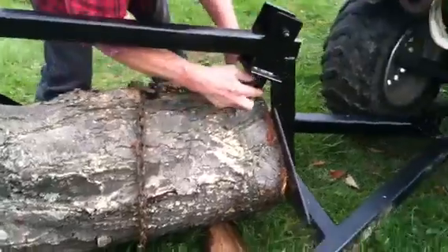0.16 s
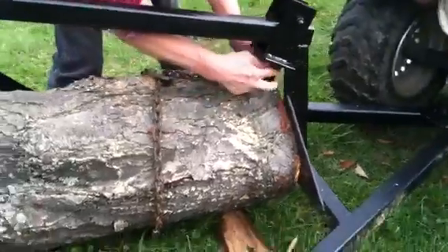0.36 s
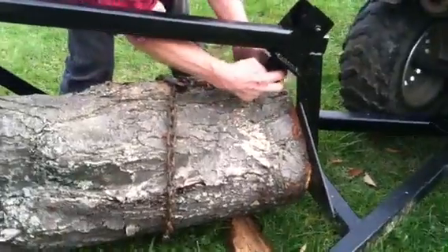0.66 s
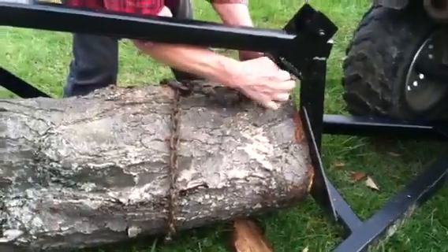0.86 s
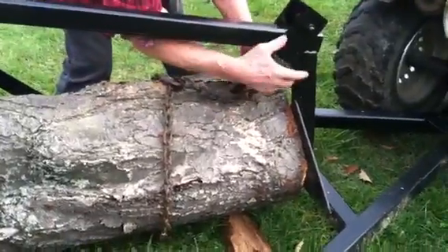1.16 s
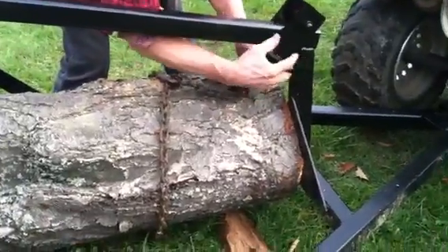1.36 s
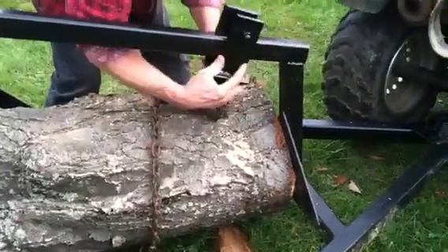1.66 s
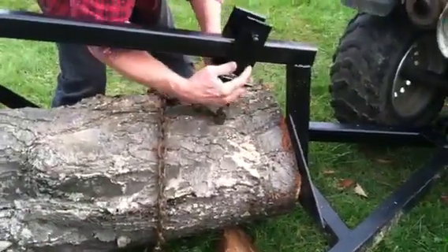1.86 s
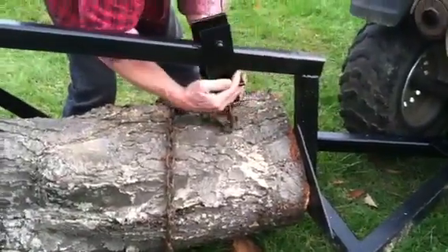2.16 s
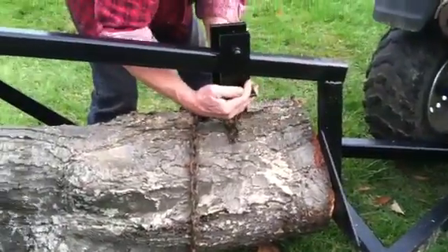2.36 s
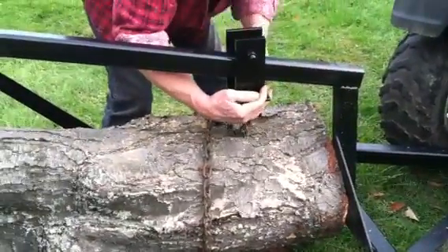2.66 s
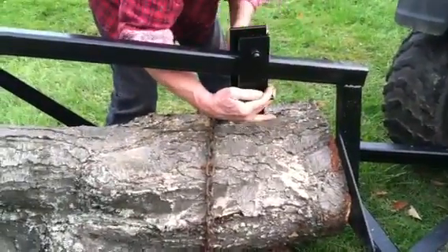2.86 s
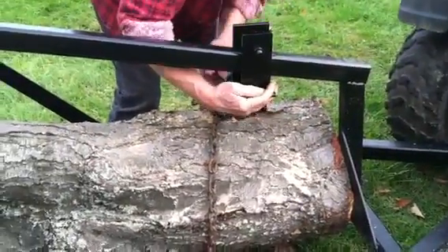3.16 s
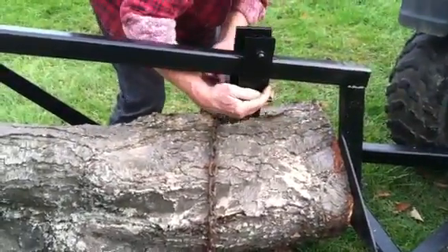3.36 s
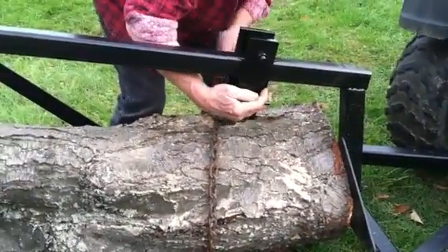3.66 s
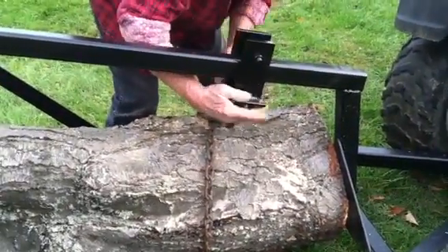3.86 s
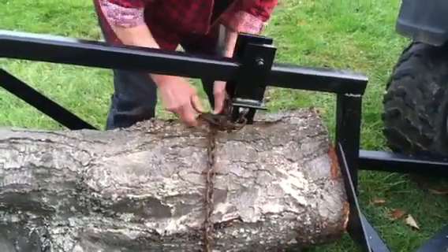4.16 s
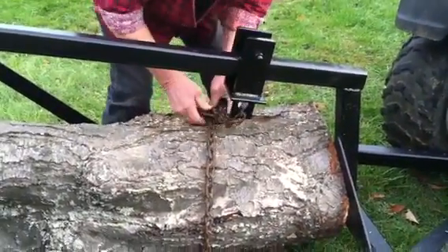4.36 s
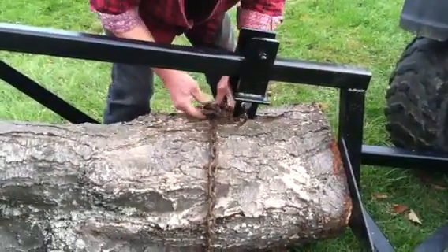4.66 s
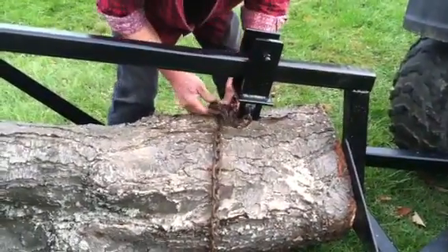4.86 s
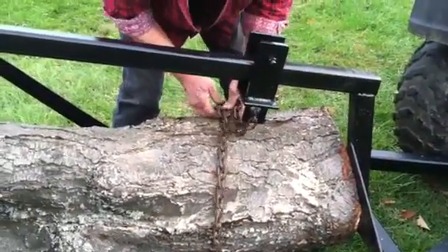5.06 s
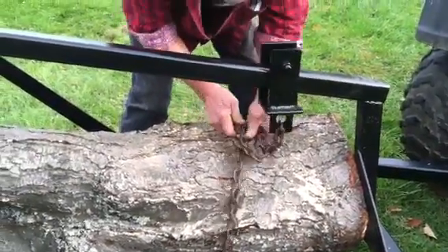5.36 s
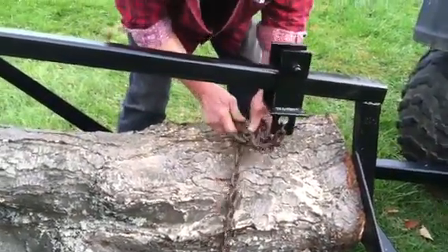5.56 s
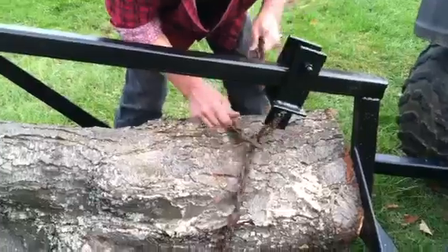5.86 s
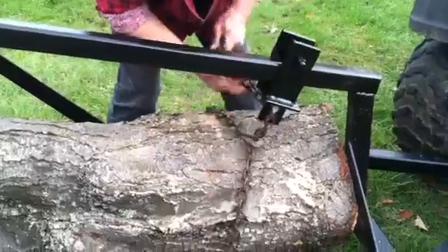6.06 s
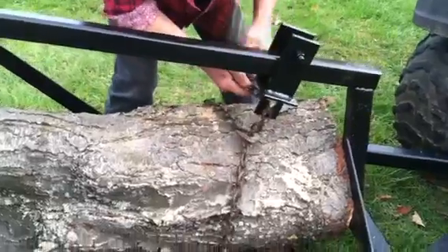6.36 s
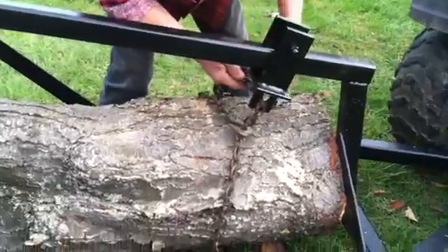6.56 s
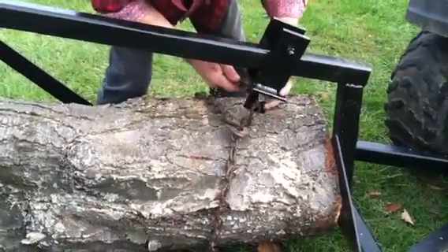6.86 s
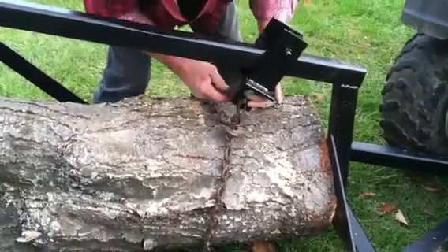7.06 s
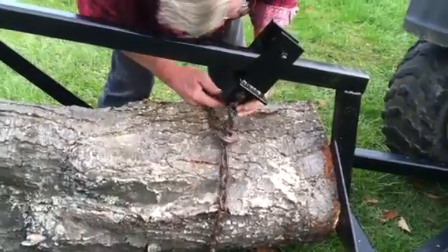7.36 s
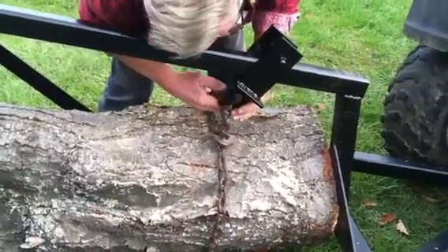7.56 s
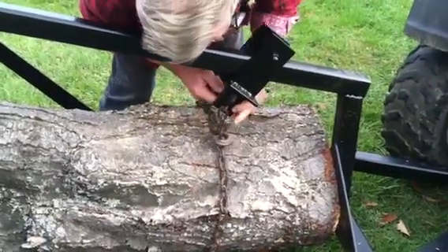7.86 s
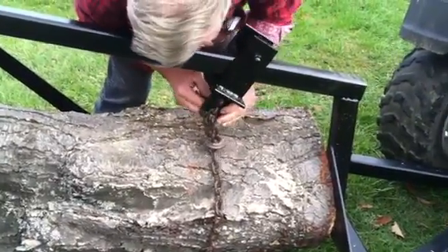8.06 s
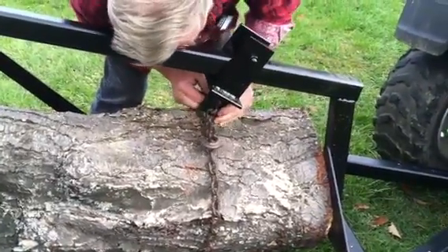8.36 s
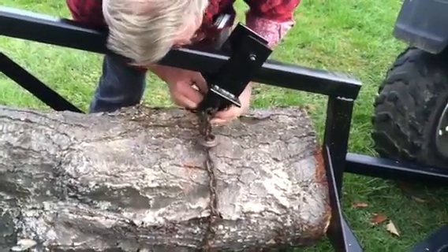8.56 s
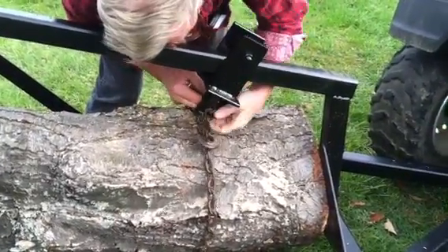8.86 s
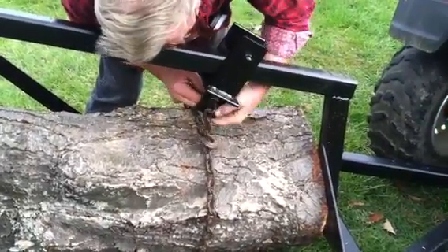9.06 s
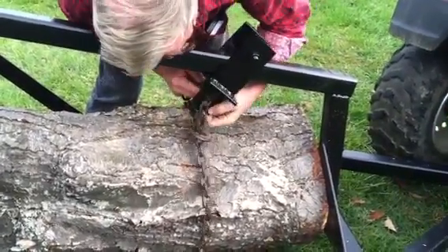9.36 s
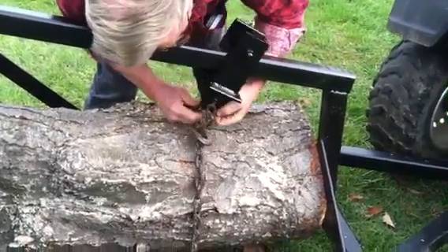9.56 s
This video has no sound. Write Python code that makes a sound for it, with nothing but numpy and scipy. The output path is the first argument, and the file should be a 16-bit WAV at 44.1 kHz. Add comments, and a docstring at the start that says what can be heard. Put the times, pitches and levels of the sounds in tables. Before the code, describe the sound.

Close microphone in an open yard, faint steady air underneath. A small steel hook clinks lightly, then a bracket scrapes in jerks along a hollow beam. Chain links clash sharply in bursts, tick between fingers and rub softly over rough bark. A dense rattling clatter comes around six seconds, then two loud, blunt, ringing knocks on the beam late on, with quieter fiddling between them.

```python
"""Outdoor yard, close by: a steel chain is hooked around a log under a trailer's steel frame.
The hook clinks, and its bracket grates along and knocks on the hollow beam; links clash, tick and drag over bark.
Steel rings as sums of decaying modes; friction is random grains through such modes or a spectrum.
Soft low bumps and rumble on the microphone, a faint echo and steady filtered noise lie underneath."""
import sys
import numpy as np
from scipy import signal
from scipy.fft import rfft, irfft, next_fast_len
from scipy.io import wavfile

SR = 44100
rng = np.random.default_rng(int(sys.argv[2]) if len(sys.argv) > 2 else 0)


def master(y):
    """Save y as 16-bit WAV."""
    cut = np.clip(np.atleast_2d(y).T, -1, 1)
    pcm = np.round(cut * 32767)  # scale
    wavfile.write(sys.argv[1], SR, pcm.astype(np.int16))


N = 428211
T = np.arange(int(SR * .7)) / SR  # time within one sound, s

# modes of the hollow beam and its bracket: pitch_hz, level_db, t60_s
BEAM = [(275, -15, .24), (428, -13, .27), (776, -17, .45), (1007, -7, .36), (1105, -5, .32),
        (1178, -3, .18), (1254, -4, .33), (1284, 0, .24), (1484, -13, .55), (1615, -15, .42),
        (1730, -11, .48), (1790, -10, .3), (1857, -6, .34), (1905, -13, .3), (2003, -19, .45),
        (2237, -18, .45), (2401, -20, .42), (2490, -18, .35), (3020, -25, .35), (3446, -22, .4),
        (3535, -25, .5), (4985, -28, .5), (5227, -27, .33), (6858, -23, .7), (7154, -27, .5),
        (7410, -27, .3), (7750, -27, .25), (8250, -29, .3)]
BEAM_HZ = np.transpose(BEAM)[0]
# spectrum of the chain links: freq_hz, level_db
LINKS = [(1500, -17.5), (2500, 2), (4000, -6.5), (5900, 4.5), (7500, 5), (9000, -2.5), (10800, -7.5),
         (12500, -4.5), (15000, -22)]
# spectrum of the bracket: freq_hz, level_db
BRACKET = [(30, -77), (130, -3), (420, -5.5), (950, 4), (1600, 16), (2500, 5), (3400, 2), (4400, -5),
           (12000, -32.5)]
SCATTER_DB = 2.5  # spread of mode strengths from contact to contact


def knocks():
    """Heavy, blunt blows ring the beam's low modes over a thud of the whole frame."""
    # bracket on beam: start_s, level_db, favoured_hz (set by the point of contact)
    blows = [(0.499, -42, 1200), (0.628, -18, 955), (0.708, -18.5, 960), (1.759, -25, 1210),
             (1.49, -39.5, 700), (4.328, -46.5, 780), (5.925, -14, 1360), (5.97, -21, 715),
             (7.2477, -4, 1160), (7.453, -31, 810), (8.13, -20.5, 1090), (8.745, -44, 1000),
             (9.4002, -4, 1500), (9.523, -29, 380)]
    # spectrum of the frame's thud: freq_hz, level_db
    thud_spectrum = [(30, -45.5), (90, -24), (200, 3), (500, 10), (1200, 6), (2200, -2.5), (4000, -18.5),
                     (9000, -25), (15000, -46)]
    favour_db_per_octave = 15.5  # loss of modes away from the favoured pitch
    thud_db, thud_db_per_db = -10, 0.5  # thud grows slower than the ring: soft blows mostly thud
    sing_spectrum = [(1800, -26.0), (3450, -15.5), (5000, -14), (7000, -20.5)]
    out = np.zeros(N)
    for start_s, level_db, favoured_hz in blows:
        contact = amp(-favour_db_per_octave * np.abs(np.log2(BEAM_HZ / favoured_hz)))
        ring = modes_ring(BEAM, contact, scatter_db=2.0) + amp(-5) * puff(BRACKET, 0.057)
        sing = beam_ring(sing_spectrum, scatter_db=SCATTER_DB)
        thud = puff(thud_spectrum, 0.17)
        thud = thud + amp(-6.5) * cluster(thud_spectrum, 0.33, count=110, top_hz=3395)
        steel = amp(level_db) * (ring + amp(-20.5) * sing)
        blow = steel + amp(thud_db + thud_db_per_db * level_db) * thud
        add(out, start_s, amp(-11.5) * blow * rise(0.00093))
    return out


def clinks(count=3):
    """The hand damps the hook; each tap chatters briefly and favours the modes near one pitch."""
    # hook taps: start_s, level_db, t60_s (of the first touch), favoured_hz (set by the point of contact)
    taps = [(0.065, -32.5, 0.04, 4460), (0.197, -31.5, 0.24, 4660), (.342, -21.5, 0.042, 6760),
            (0.468, -36.5, 0.13, 5100), (0.622, -24, 0.096, 4320), (0.653, -27, 0.074, 5200),
            (0.8826, -38.5, 0.011, 4740), (1.061, -36.5, 0.06, 4470), (0.941, -25.5, 0.063, 3860),
            (0.975, -33.5, 0.17, 5460), (0.991, -24, 0.005, 6900), (1.001, -30, 0.048, 4140),
            (1.034, -31, 0.057, 5550), (1.458, -36, 0.032, 4440), (3.4126, -27, 0.04, 10700),
            (5.111, -45.5, 0.017, 2900), (5.264, -43.5, 0.06, 3000), (5.663, -48, 0.06, 3130),
            (5.845, -19.5, 0.097, 8200), (5.865, -23.5, 0.1, 5700), (5.889, -27, 0.099, 4530),
            (5.9, -17, 0.099, 6060), (7.148, -40, 0.081, 4870), (7.537, -39, 0.079, 5300),
            (8.682, -32.5, 0.055, 6350), (8.726, -41.5, 0.024, 5850), (9.416, -30.5, 0.073, 4280),
            (9.555, -38.5, 0.42, 5860)]
    # modes of the hook: pitch_hz, level_db
    hook_modes = [(2550, 16), (4460, 7.5), (5230, -9.5), (5960, 0), (6390, 1), (7320, 7), (9840, 3),
                  (12870, -12.5), (14570, -6.5)]
    hz, mode_db = np.transpose(hook_modes)
    out = np.zeros(N)
    for start_s, level_db, t60_s, favoured_hz in taps:
        favour_db = -25.8 * np.abs(np.log2(hz / favoured_hz))
        gains = amp(mode_db + favour_db + 2 * rng.standard_normal(len(hz)))
        ring = np.zeros(len(T))
        for touch in range(count):
            # each touch loads the hook differently, shifting its modes; later ones are weaker and deader
            loaded_hz = hz * (1 + (0.00044 + 0.035 * touch) * rng.standard_normal(len(hz)))
            touch_ring = sines(loaded_hz, gains).sum(axis=0) * fade(t60_s / (1 + touch)) * rise(0.00013)
            add(ring, touch * rng.uniform(0.0015, 0.006), amp(-5 * touch) * touch_ring)
        softness = [(favoured_hz * 2.7, 0), (favoured_hz * 3, -18)]
        click = struck(coloured(cluster(LINKS, 0.0032), softness))
        contact = amp(-8.0) * click + amp(-17.5) * cluster(BRACKET, 0.17)
        add(out, start_s, amp(level_db - 4.5) * (struck(ring) + contact) * rise(0.00079))
    return out


def clashes(count=3):
    """A link scrapes, lands and its neighbours follow; the bracket clanks and the beam sings on."""
    # links on bracket: start_s, level_db, bracket_db (relative to the links)
    hits = [(.183, -27.5, -2), (2.679, -13, -2.5), (2.814, -8.5, -11), (2.88, -10, -6), (2.8888, -4, -18),
            (2.916, -19, 4.5), (2.9247, -1.5, -12.5), (3.03, -40.5, 19), (3.1516, -40.5, 19),
            (3.192, -24.5, 2.5), (3.7649, -5, -4.5), (4.2, -6.5, -16.5), (5.817, -21, -19),
            (5.899, -5, -11), (5.9239, -9.5, 5), (5.9552, -1.5, -21.5), (5.966, -5, -28), (5.9709, 1, -19),
            (5.999, -13, -20.5), (6.022, -9.5, -17), (6.028, -1, -14.5), (6.207, -24.5, -28),
            (6.51, -26.5, -17), (7.213, -17, -11), (7.25, -20, 12.5), (7.284, -20.5, -21),
            (7.674, -26.5, -2), (9.412, -25, 8), (9.569, -18.5, -6), (9.581, -11.5, -6.5),
            (9.588, -11, -7.5)]
    clash_t60_s, follow_db, follow_t60_s = .026, -7, .03
    sing_db = -17.5  # after-ring relative to the links
    lead_s, lead_db = 0.0035, -27.5  # scrape before landing: growth time, relative level
    clank_spectrum = [(1300, -10.0), (1700, 6.0), (1860, -64.5), (2400, 2.0), (5000, -30.5)]
    sing_spectrum = [(1800, -34.0), (3500, -7.5), (5000, -6.0), (6800, -16.5), (7500, 5.0), (11000, -11)]
    out = np.zeros(N)
    for start_s, level_db, bracket_db in hits:
        clatter = cluster(LINKS, clash_t60_s) + amp(-13) * scrape_ring(LINKS)
        for delay_s in rng.uniform(0.0035, 0.022, count):
            follower = cluster(LINKS, follow_t60_s, count=45)
            add(clatter, delay_s, amp(follow_db - 460 * delay_s) * follower)
        clank = cluster(BRACKET, 0.18, count=110, top_hz=5795)
        clank = clank + amp(-8.5) * beam_ring(clank_spectrum, scatter_db=SCATTER_DB)
        sing = beam_ring(sing_spectrum, scatter_db=SCATTER_DB) + amp(5) * cluster(LINKS, 0.21, count=140)
        clash = struck(clatter) + amp(bracket_db) * clank + amp(sing_db) * sing
        add(out, start_s, amp(level_db - 15.0) * clash * rise(0.0015))
        lead = coloured(rng.standard_normal(len(T)), LINKS) * np.exp(-T / lead_s)
        add(out, start_s - T[-1], amp(level_db + lead_db) * lead[::-1])  # reversed: it swells
    return out


def ticks():
    """Light, dry contacts of links held in the fingers, each over a dull tap; fainter ones come at random."""
    # link on link: start_s, level_db
    contacts = [(2.801, -26), (5.927, -2.5), (6.006, -5), (6.202, -23), (6.2091, -15.5), (1.85, -26),
                (2.066, -29.5), (2.495, -25.5), (2.593, -29), (3.4148, -14), (3.998, -30.5), (4.33, -23),
                (4.429, -28), (4.53, -20.5), (4.561, -28.5), (4.732, -29), (5.463, -30), (5.494, -23.5),
                (5.7217, -21.5), (5.7674, -22.5), (5.775, -24), (7.456, -23), (7.648, -10.5),
                (7.926, -34.5), (8.521, -40), (9.299, -27)]
    tick_t60_s = .014
    tap_db, tap_db_per_db = -30.5, 0.079  # the tap hardly grows with the tick
    out = amp(-68) * rattle(LINKS, t60=0.018, rate=30, spread_db=9)
    for start_s, level_db in contacts:
        tick = cluster(LINKS, tick_t60_s, count=45) + puff(LINKS, 0.0024)
        tap = cluster(BRACKET, 0.09) + amp(0.5) * puff(BRACKET, 0.054)
        both = amp(level_db) * tick + amp(tap_db + tap_db_per_db * level_db) * tap
        add(out, start_s, amp(-19.0) * both * rise(0.00012))
    return out


def slide():
    """The bracket sticks and slips along the beam: small slips crunch, ring and chatter; big jerks stand out."""
    # pushes along the beam: start_s, end_s, grating_db, chatter_db
    pushes = [(1.52, 1.55, -46, -43.5), (1.595, 1.64, -31, -29.5), (1.69, 1.773, -32.5, -48),
              (2.147, 2.203, -33.5, -67.5), (2.224, 2.305, -32.5, -35.5), (2.675, 2.99, -44.5, -42.5),
              (5.942, 6.033, -35, -52.5), (7.195, 7.24, -40.5, -48), (7.927, 8.148, -47.5, -62)]
    # steel sticks and jerks free: start_s, level_db, treble_db
    jerks = [(1.428, -47, -5), (1.561, -27.5, -7.5), (1.6079, -26, -2), (1.733, -32.5, -11),
             (2.1503, -32, -2), (2.167, -45, 2), (2.21, -29, 4.5), (2.2332, -34, 7), (2.251, -30, -5.5),
             (2.259, -24, -2), (2.286, -39.5, 11), (2.312, -30, 3), (5.5303, -33.5, -10.5)]
    # spectrum of the grating: freq_hz, level_db
    grate_spectrum = [(100, -49), (200, -0.5), (430, 5), (850, -3.5), (1200, 7.5), (3200, -10), (3800, -11),
                      (8300, -20), (12000, -31), (16000, -73)]
    ring_spectrum = [(420, 0.5), (1300, -17.0), (2200, -25.0), (3450, -22.5), (5000, -23.5), (7000, 2.0)]
    crunch = rattle(grate_spectrum, t60=0.039, rate=800, spread_db=6)
    slips = grains(rate=220, spread_db=-4.5)
    ring = unit(signal.fftconvolve(slips, beam_ring(ring_spectrum, scatter_db=SCATTER_DB))[:N])
    grating_gain = strokes(pushes, rise_db_per_s=174, fall_db_per_s=194.0)
    chatter_rows = [(start_s, end_s, level_db) for start_s, end_s, _, level_db in pushes]
    chatter_gain = strokes(chatter_rows, rise_db_per_s=398.0, fall_db_per_s=304)
    out = grating_gain * (amp(-5.5) * crunch + amp(-11.5) * ring) + amp(-3.5) * chatter() * chatter_gain
    for start_s, level_db, treble_db in jerks:
        jerk_ring = scrape_ring([(3200, 0), (5200, treble_db)])
        grit = amp(-11.5) * cluster(grate_spectrum, 0.18)
        grit = grit + amp(treble_db - 19.0) * cluster(LINKS, 0.022, top_hz=11150)
        add(out, start_s, amp(level_db) * (jerk_ring + grit) * rise(0.0012))
    return out


def chatter(count=6):
    """Dense, tiny slips at several points; the load wanders among them, so the rasp keeps changing colour."""
    slips_per_s, slip_spread_db = 800, 4.5
    grip_per_s, grip_db = 35, 5  # rate and extent of the load's shifts
    out, knots = np.zeros(N), np.arange(N) * grip_per_s / SR
    knot_count = int(knots[-1]) + 2
    for point in range(count):
        load_db = grip_db * np.interp(knots, np.arange(knot_count), rng.uniform(-1.4, 1, knot_count))
        ring = scrape_ring([(2200, -1), (3100, 1), (5300, -6.5)]) * rise(.0006)
        slips = amp(load_db) * grains(slips_per_s / count, slip_spread_db)
        out += signal.oaconvolve(slips, ring)[:N]
    return unit(out)


def rubs():
    """A link rubs softly on steel: fine friction grains excite one narrow resonance."""
    # rubs: start_s, end_s, level_db, pitch_hz
    rub_rows = [(2.667, 2.806, -42, 1680), (4.559, 4.575, -47.5, 1540), (4.835, 4.87, -53.5, 2620)]
    out = np.zeros(N)
    for start_s, end_s, level_db, hz in rub_rows:
        t = T - .1  # room for the swell
        band = [(hz / 3, -42), (hz / 1.44, -13), (hz, 0), (hz * 1.16, -13), (hz * 3, -36)]
        friction = rng.standard_normal(len(T)) * (rng.random(len(T)) < 900 / SR)
        swell = amp(960 * np.minimum(t, 0) - 270 * np.maximum(t - (end_s - start_s), 0))
        add(out, start_s + t[0], amp(level_db) * coloured(friction, band) * swell)
    return out


def sings():
    """After some knocks, jerks and clashes one mode of the beam sings on; its neighbours answer more weakly."""
    # singing modes: start_s, level_db, pitch_hz
    sing_rows = [(2.259, -47.5, 6858), (2.924, -60, 6858), (3.193, -41, 1660), (4.2002, -45, 3600),
                 (4.2002, -46, 5227), (4.2002, -49, 7500), (6.028, -38, 6800), (6.028, -49, 3500),
                 (6.028, -56, 1670), (7.213, -45, 3400), (7.249, -36, 3390), (7.282, -43.5, 7130),
                 (8.13, -54.5, 3280)]
    out = np.zeros(N)
    for start_s, level_db, hz in sing_rows:
        contact = amp(-220 * np.abs(np.log2(BEAM_HZ / hz)))
        ring = modes_ring(BEAM, contact, scatter_db=SCATTER_DB)
        add(out, start_s, amp(level_db) * ring * rise(0.00197))
    return out


def drag():
    """The chain rubs over bark, flakes crackle and snap under it and loose links jingle faintly."""
    # pulls over bark: start_s, end_s, level_db
    pulls = [(0, .25, -50.5), (4.3, 4.85, -58.5), (5.365, 5.44, -38), (5.52, 5.82, -51), (6.38, 6.5, -54.5),
             (6.51, 6.545, -45.5), (7.66, 7.73, -45)]
    # spectrum of the bark: freq_hz, level_db
    bark_spectrum = [(70, -33.5), (229, 0.5), (1580, -8.5), (2130, -4.5), (3700, -18), (7290, -15),
                     (16000, -36)]
    snaps = coloured(grains(rate=900, spread_db=5.5), bark_spectrum)
    crackle = rattle(bark_spectrum, t60=0.016, rate=500, spread_db=5, count=8)
    jingle = rattle(LINKS, t60=0.015, rate=110, spread_db=5)
    gain = strokes(pulls, rise_db_per_s=155, fall_db_per_s=151.5)
    return gain * (amp(-9) * snaps + amp(-7) * crackle + amp(-10.5) * jingle)


def bumps():
    """Microphone bumps swell and die within a few low cycles amid a lumpy rumble, which also comes in spells."""
    # bumps: crest_s, level_db
    bump_rows = [(3.572, -25.5), (3.957, -30.5), (4.164, -26.5), (6.597, -39), (7.163, -38)]
    # spells of rumble: start_s, end_s, level_db
    rumble_rows = [(3.58, 3.65, -52), (3.92, 3.96, -40.5), (4.39, 4.69, -47), (8.67, 8.87, -55.5)]
    bump_hz = 185
    spectrum = [(40, -45), (90, 8.0), (150, 10.0), (280, -4.5), (500, -62)]
    out, t = np.zeros(N), T - T.mean()
    for crest_s, level_db in bump_rows:
        swing = np.cos(2 * np.pi * (bump_hz * t + rng.random())) * np.exp(-(t / 0.0036) ** 2)
        rumble = coloured(rng.standard_normal(len(t)), spectrum) * np.exp(-np.abs(t) / 0.05)
        add(out, crest_s - T.mean(), amp(level_db) * (swing + amp(-16.0) * rumble))
    spells = strokes(rumble_rows, rise_db_per_s=600, fall_db_per_s=498)
    return out + spells * coloured(grains(rate=380, spread_db=5.5), spectrum)


def echo(x):
    """Ground and machinery scatter a short, faint tail; grass swallows its treble."""
    tail = coloured(rng.standard_normal(len(T)), [(3000, 0.0), (7000, -2.5), (10000, -20.0)])
    tail = tail * fade(0.54) * rise(0.0025)
    return signal.fftconvolve(x, tail / np.linalg.norm(tail))[:N]


def yard():
    """Steady air of the yard: noise with a fixed spectrum."""
    # spectrum of the yard: freq_hz, level_db
    yard_spectrum = [(20, -39), (44, -17.5), (163, 2.5), (399, -1.5), (1480, -5.5), (8410, -22.5),
                     (12800, -27.5), (16000, -62.5)]
    return amp(-57.5) * coloured(rng.standard_normal(N), yard_spectrum)


def beam_ring(contact, scatter_db):
    """The beam's modes, weighted by the spectrum of the contact."""
    return modes_ring(BEAM, gain_at(contact, BEAM_HZ), scatter_db)


def scrape_ring(contact):
    """The bracket's resonances as one point of contact shifts and weights them."""
    # resonances under a sliding contact: pitch_hz, level_db, t60_s
    resonances = [(437.7, -17, 0.18), (1190, -36.5, 0.08), (1658, -6, 0.028), (2155, 3.5, 0.031),
                  (2500, 0, 0.022), (3140, 0, 0.033), (5220, -8.5, 0.086), (6260, 5, 0.0071),
                  (7150, -1, 0.019), (8190, -7.5, 0.029), (9820, -8.5, 0.031)]
    hz, db, t60_s = np.transpose(resonances)
    shifted_hz = hz * (1 + .018 * rng.standard_normal(len(hz)))
    return modes_ring(np.transpose([shifted_hz, db, t60_s]), gain_at(contact, hz), scatter_db=SCATTER_DB)


def modes_ring(table, weights, scatter_db):
    """Ring (Hz, dB, t60 s) modes at strengths that change with each contact; close pairs beat."""
    split_share, beat_depth = .003, .4  # pair's split relative to its pitch; depth at the top mode
    hz, db, t60_s = np.transpose(table)
    gains = weights * amp(db + scatter_db * rng.standard_normal(len(hz)))
    beat_hz = split_share * hz * rng.uniform(.3, 1.3, len(hz))
    beats = 1 + sines(beat_hz, beat_depth * hz / hz.max())
    decay = np.exp(np.float32(-np.log(1000) * T / t60_s[:, None]))
    return struck((sines(hz, gains) * beats * decay).sum(axis=0))


def cluster(spectrum, t60, count=70, top_hz=15900):
    """Many unlike steel modes, crowded towards the bass, each with its own strength and life."""
    hz = 120 + top_hz * ((np.arange(count) + rng.random(count)) / count) ** 1.5
    # hz ** (1/6) makes up for the sparser treble modes
    gains = gain_at(spectrum, hz) * hz ** (1 / 6) * amp(4 * rng.standard_normal(count))
    lives_s = max(t60, .005) * rng.uniform(.5, 1.5, count)
    size = min(int(1.5 * lives_s.max() * SR) + 500, len(T))
    t = T[:size].astype(np.float32)
    rows = np.float32([2 * np.pi * hz, np.log(1000) / lives_s, 2 * np.pi * rng.random(count)])
    turn, loss, phase = rows[:, :, None]
    ring = gains @ (np.sin(turn * t + phase) * np.exp(-loss * t))
    return struck(np.pad(ring, (0, len(T) - size)))


def puff(spectrum, t60):
    """Countless close modes dying together: decaying noise."""
    return coloured(rng.standard_normal(len(T)), spectrum) * fade(t60)


def rattle(spectrum, t60, rate, spread_db, count=6):
    """Random contacts at several spots, each spot ringing with its own modes."""
    spots = [(cluster(spectrum, t60) * rise(.002))[:SR // 5] for spot in range(count)]
    return unit(sum(signal.oaconvolve(grains(rate / count, spread_db), ring)[:N] for ring in spots))


def grains(rate, spread_db):
    """Random impulses of uneven size and either sign, rate a second on average."""
    hits = rng.random(N) < rate / SR
    signs = rng.choice([-1, 1], N)
    return hits * signs * amp(spread_db * np.clip(rng.standard_normal(N), -2, 2))


def stroke(start, end, rise_db_per_s, fall_db_per_s):
    """Gain of one movement of the hand: it swells, holds from start to end and dies away."""
    t = np.arange(N) / SR
    gain_db = rise_db_per_s * np.minimum(t - start, 0) - fall_db_per_s * np.maximum(t - end, 0)
    return amp(np.maximum(gain_db, -120))


def strokes(rows, rise_db_per_s, fall_db_per_s):
    """Gain over time of (start s, end s, dB) movements; the strongest leads."""
    gains = [amp(db) * stroke(start, end, rise_db_per_s, fall_db_per_s) for start, end, db, *_ in rows]
    return np.max(gains, axis=0)


def sines(hz, gains):
    """One sine a row, each starting anywhere in its cycle."""
    phase = 2 * np.pi * (np.outer(hz, T) + rng.random((len(hz), 1)))
    return gains[:, None] * np.sin(phase.astype(np.float32))


def rise(seconds):
    """Onset gain: steel chatters into contact rather than landing at once."""
    return 1 - np.exp(-T / seconds)


def fade(t60):
    """Decay by 60 dB in t60 seconds."""
    return amp(-60 * T / max(t60, .001))


def coloured(x, spectrum):
    """x filtered by the given spectrum, at rms 1."""
    m = next_fast_len(len(x) + 2048)
    gain = gain_at(spectrum, np.fft.rfftfreq(m, 1 / SR))
    return unit(irfft(rfft(x, m) * gain, m)[:len(x)])


def gain_at(spectrum, hz):
    """Gain of (Hz, dB) points, interpolated on a log axis."""
    f, db = np.transpose(spectrum)
    return amp(np.interp(np.log(hz + 1), np.log(f), db))


def amp(db):
    """Decibels to gain."""
    return 10 ** (np.asarray(db) / 20)


def unit(x):
    """Scale to rms 1."""
    return x / np.sqrt(np.mean(x ** 2) + 1e-20)


def struck(x):
    """Scale a hit so that its first hundredth of a second has rms 1."""
    return x / np.sqrt(np.mean(x[:SR // 100] ** 2) + 1e-20)


def add(track, s, sound):
    """Mix a sound in at s seconds; a start before 0 becomes 0."""
    part = track[max(round(s * SR), 0):][:len(sound)]
    part += sound[:len(part)]


def scene():
    """Steel on steel over the steady air of the yard; the hook, cupped in the hand, stays almost dry."""
    steel = knocks() + clashes() + ticks() + slide() + rubs() + sings() + drag()
    hook = clinks()
    cupped = amp(-10) * hook  # the hook's share in the echo
    mix = steel + hook + amp(-20.5) * echo(steel + cupped) + bumps() + yard()
    return mix[None]


def record(dry):
    """The camera keeps nothing above its band limit."""
    top_hz = 16200
    m = next_fast_len(N + SR // 2)
    passed = np.fft.rfftfreq(m, 1 / SR) < top_hz
    return irfft(rfft(dry, m) * passed, m)[:, :N]


dry = scene()
out = record(dry)
master(out)
```